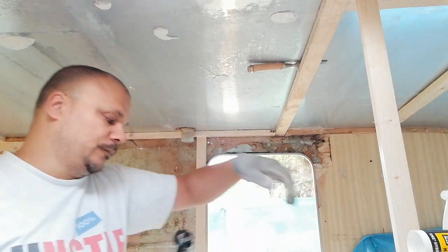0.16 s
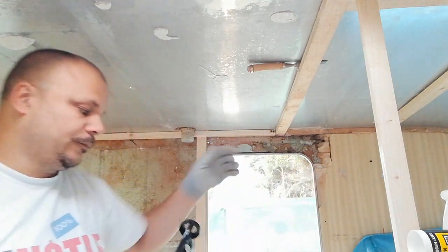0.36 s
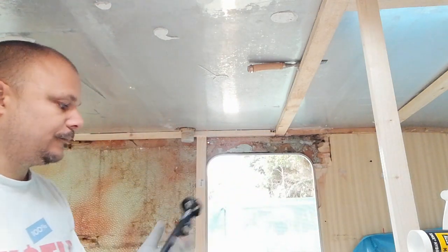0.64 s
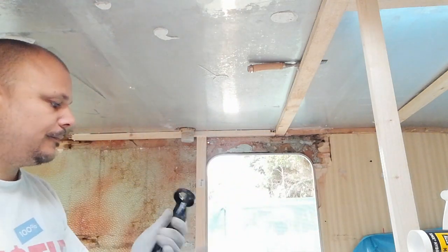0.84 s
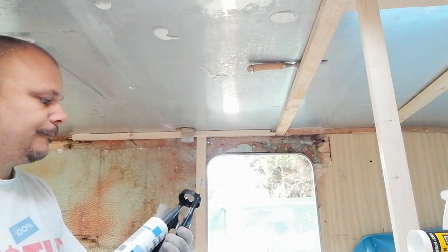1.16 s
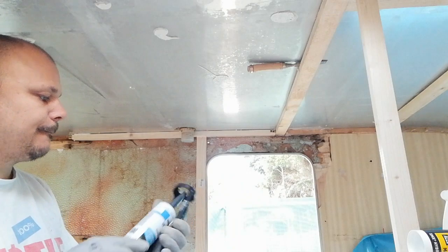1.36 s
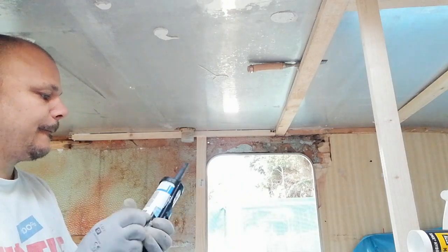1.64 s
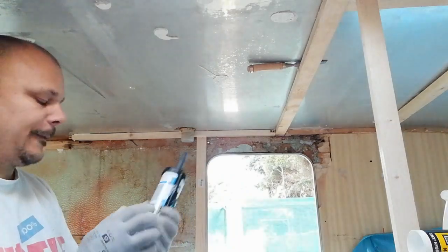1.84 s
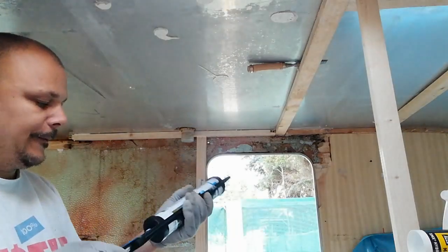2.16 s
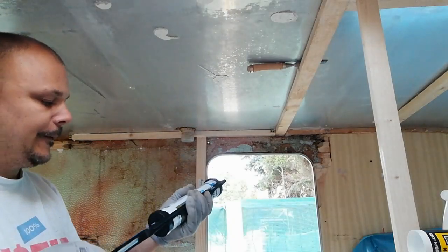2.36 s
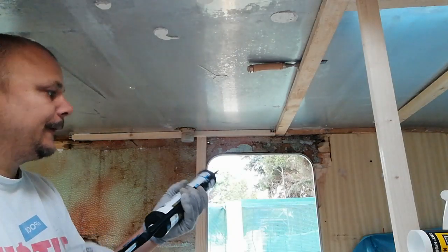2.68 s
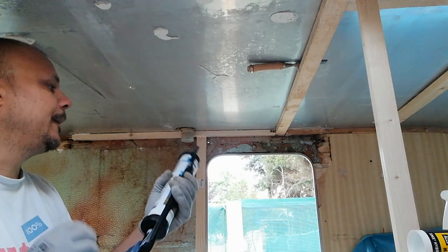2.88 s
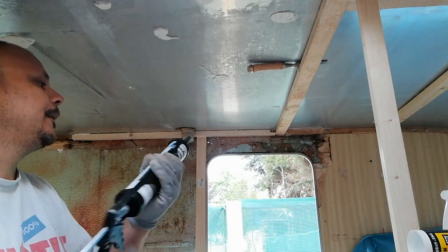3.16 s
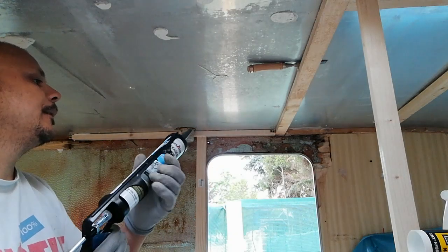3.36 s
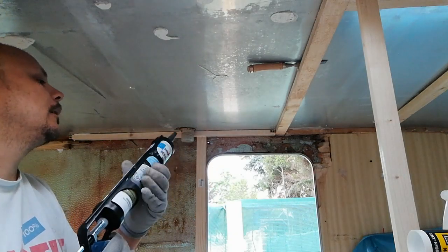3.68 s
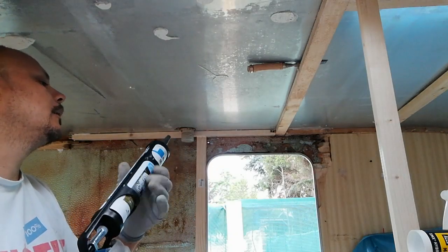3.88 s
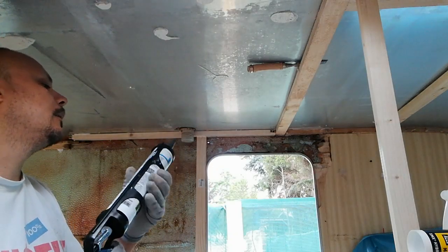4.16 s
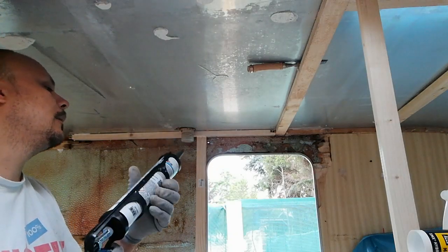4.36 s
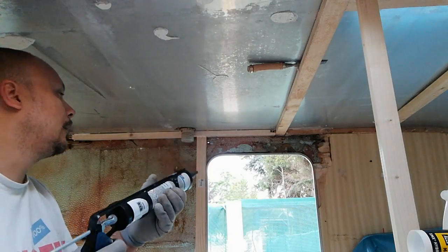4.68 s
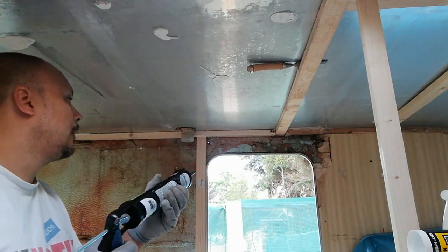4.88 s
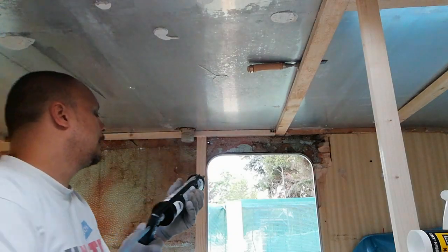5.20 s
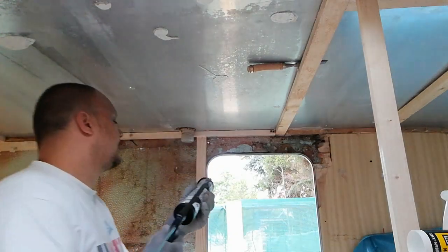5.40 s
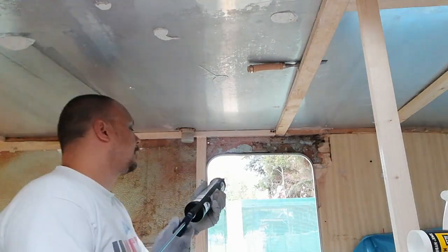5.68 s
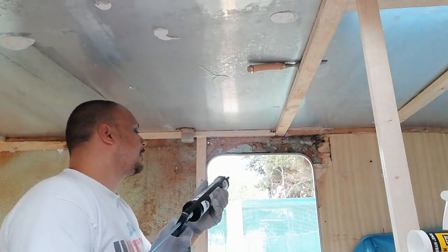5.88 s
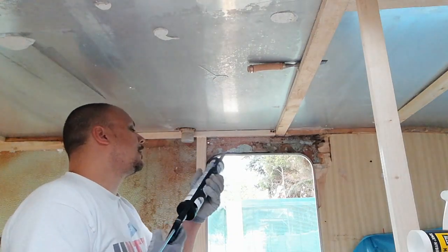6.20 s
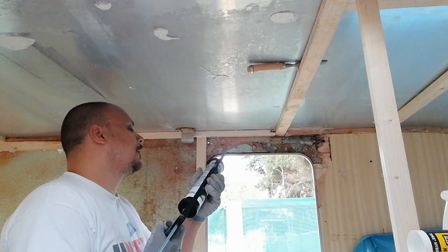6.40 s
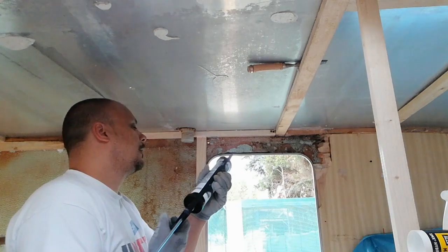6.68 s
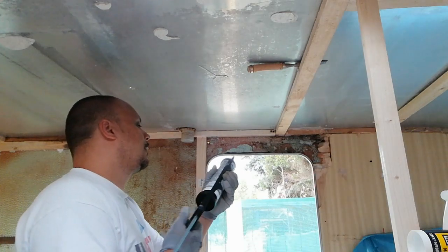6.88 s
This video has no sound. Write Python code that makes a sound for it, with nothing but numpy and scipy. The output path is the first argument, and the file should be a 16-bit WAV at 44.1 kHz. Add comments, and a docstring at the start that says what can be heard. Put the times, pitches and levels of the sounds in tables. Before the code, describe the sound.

Close stereo sound in a small, bare-panelled caravan with short echo; a very quiet low rumble and distant murmur come from outside. A soft rub and faint knock open, another light tap at 0.2 s, then small bright metal clicks around 0.75-0.85 and soft floor thuds. A faint airy squeak hangs near 1 s. From 1.45 clicks gather quickly into hard, hollow and metallic clacks at 1.54-1.6, followed by a scrape and an uneven fading rattle to about 1.8. A firm low hollow knock lands at 2.55. A crisp double click at 3.3 leaves a thin spring tone. Then mostly faint glove rustle and slides, tiny taps near 4.1 and 4.7-5. Light sliding from 5.2 leads to the loudest, sharp metallic snap at 5.57. A bright raspy slide and click come at 6.15, then soft rubbing and a dull foot thud at 6.9.

```python
"""A soft rub and a light knock come first, as a sealant cartridge is pushed into a steel caulking gun in a bare caravan.
Bursts of chatter knock the hollow tube, frame and rod; runs of tiny slips slide over the same three parts.
Clusters of beating modes ring the gun, a paired tone sings as its spring, and narrow noise squeaks in the rod guide.
Coloured noise makes the glove rustle, the thuds of shifting feet and the quiet outdoor rumble and murmur."""
import sys
import numpy as np
from scipy import signal
from scipy.fft import rfft, irfft, next_fast_len
from scipy.io import wavfile
from scipy.ndimage import map_coordinates

SR = 44100
rng = np.random.default_rng(int(sys.argv[2]) if len(sys.argv) > 2 else 0)


def put_to_file(sound):
    """Save the sound as 16-bit audio at rate SR, in the file named by the first command-line argument."""
    columns = np.atleast_2d(sound).T  # one column per channel
    safe = np.clip(columns, -1, 1)
    whole_steps = np.round(safe * 32767)
    wavfile.write(sys.argv[1], SR, whole_steps.astype(np.int16))


N = 310419  # samples

# Contacts of the gun's parts: (t/s, relative level/dB of hollow tube, of frame, of rod, struck spot's favoured f/Hz)
CONTACT_HITS = [(0.039, -57, -59, -70, 1240), (.203, -51.5, -57, -54.5, 1490),
                (.744, -63, -50.5, -51.5, 2980), (.797, -53, -44.5, -52.5, 4900),
                (.835, -65, -53, -65, 4900), (1.34, -72, -63.5, -75, 1270), (1.452, -69, -72, -57.5, 11000),
                (1.475, -53, -56, -48, 11100), (1.492, -54, -50, -43.5, 1620),
                (1.538, -36.5, -43, -41, 1400), (1.579, -29.5, -33, -23.5, 1120),
                (1.5873, -28.5, -22.5, -20.5, 8900), (1.604, -47, -28, -36, 2720),
                (1.696, -43, -57, -50.5, 1290), (1.775, -50, -49.5, -74.5, 1080),
                (1.817, -52, -47, -60, 1440), (2.316, -60.5, -70, -68, 1324), (2.52, -61, -42.5, -54, 3600),
                (2.53, -42.5, -54, -48, 1420), (2.553, -43, -43, -48, 1700),
                (2.5574, -24.5, -37.5, -31, 780), (3.2861, -36.5, -41.5, -42, 1410),
                (3.3187, -41.5, -42.5, -40, 1400), (4.06, -55, -59, -60.5, 750),
                (4.127, -58, -66, -67.5, 760), (4.716, -76, -54.5, -47, 7200),
                (4.844, -50.5, -54, -47.5, 6660), (5.034, -65, -56, -51.5, 1310),
                (5.255, -60, -60, -55.5, 4060), (5.315, -49, -60, -67, 2170),
                (5.526, -54, -47.5, -60, 2340), (5.5625, -43, -26, -27.5, 7200),
                (5.574, -26.5, -16, -17.5, 2150), (5.691, -50, -55, -48.5, 1600),
                (6.147, -46, -41, -34.5, 3740)]
# First bounce of the loose cartridge, on the contacts' scale: (tube level/dB, frame level/dB, rod level/dB)
FIRST_BOUNCE_DB = (-38.5, -37, -33.5)
# Sliding strokes of tube, rod and glove: (start t/s, rise t/s, fade t/s, relative level/dB,
# brightness level/dB: lifts the rod hiss and lowers the hollow tube)
SLIDE_STROKES = [(0, 0.0037, 0.023, -58, 0.5), (.2, 0.012, 0.061, -56, -4.5), (.733, 0.053, 0.1, -57, -2.5),
                 (1.491, 0.0057, .13, -44, 5.5), (1.628, .02, 0.12, -47, -3),
                 (1.76, 0.064, 0.082, -58.5, 0), (1.866, .035, 0.024, -53, 1),
                 (2.098, 0.024, .04, -70.5, 2), (2.49, 0.059, .02, -54.5, -5.5),
                 (3.282, .007, .007, -40.5, -2), (3.33, 0.026, .16, -60, -2.5),
                 (3.72, 0.073, 0.06, -66.5, -0.5), (4.24, .09, 0.034, -67, -0.5),
                 (4.701, 0.014, 0.093, -53, 1), (5.024, 0.015, 0.063, -52.5, 1.5),
                 (5.2, 0.46, .22, -58.5, 2), (5.8, 0.068, 0.081, -53, -3.5), (5.859, .05, 0.016, -57, 7),
                 (6.08, 0.068, .01, -58.5, 2), (6.134, 0.024, 0.089, -39, 4.5),
                 (6.33, 0.024, 0.029, -65, 4), (6.553, 0.02, 0.17, -60, -2.5),
                 (6.888, 0.0094, .1, -59, 1.5)]
# Colour of the hollow tube when struck or rubbed: (f/Hz, relative level/dB)
TUBE_COLOUR = [(60, -28), (200, -26), (320, -17.5), (450, -14), (580, -14), (700, -10.5), (850, -4.5),
               (1000, -8), (1300, 3.5), (1480, -0.5), (1800, -5), (2300, -10), (3500, -41), (9000, -67.5)]
# Colour of the frame: (f/Hz, relative level/dB)
FRAME_COLOUR = [(200, -20), (1000, -27.5), (1850, -5), (2550, 4), (3200, -2), (3900, 0), (4700, -0.5),
                (6000, -3.5), (8000, -14.5), (15000, -42.5)]
# Colour of the push rod: (f/Hz, relative level/dB)
ROD_COLOUR = [(1500, -60.5), (5000, -9), (6900, -4.5), (8000, -1), (9000, -3.5), (9700, -9), (10500, -15),
              (13000, -18), (15800, -22.5)]
# Clusters of close modes of the loaded gun: (f/Hz, half-width f/Hz, relative level/dB, t60 t/s)
RING_MODES = [(835.7, 6.2, 1, 0.19), (1160, 55, -6, 0.23), (1426, 49, 2.5, 0.12), (1770, 190, -6.5, .18),
              (1790, 70, -4, 0.31), (2540, 140, -4, 0.22), (3780, 200, -3, 0.3), (4840, 670, -1, 0.3),
              (6910, 400, -2.5, 0.17), (9500, 300, -1, .08)]
# Trigger spring singing on: (t/s, level/dB)
SPRING_TWANGS = [(2.772, -68.5), (3.325, -51.5), (4.7, -62)]
# Rod squeaking in its guide: (t/s, f/Hz, half-width f/Hz, level/dB, t60 t/s)
ROD_SQUEAKS = [(.985, 2033, 192, -58, 0.75), (5.315, 2133, 272, -61, 1.2)]
# Rustle of gloves and sleeves over time: (t/s, level/dB)
GLOVE_LEVELS = [(0, -64), (.65, -67.5), (.95, -62.5), (1.4, -67), (2.05, -71), (3.1, -72), (3.8, -66),
                (4, -70.5), (4.28, -66.5), (4.47, -76.5), (4.7, -64), (4.97, -72), (5.15, -69), (5.27, -64),
                (5.7, -64), (6.02, -72), (6.45, -68.5), (7.04, -73)]
# Colour of rubbed cloth: (f/Hz, relative level/dB)
CLOTH_COLOUR = [(900, -28), (2000, -1), (3500, -3.5), (6000, -6), (8600, 0), (10500, -11), (15000, -17.5)]
# Feet shifting on the floor: (t/s, rise t/s, level/dB)
FOOT_THUDS = [(0, 0.01, -59), (.76, 0.11, -58.5), (.92, .08, -53), (1.88, 0.027, -59), (5, 0.037, -58.5),
              (5.563, 0.0046, -54), (5.82, 0.062, -55), (6.158, 0.065, -51.5), (6.884, 0.033, -43.5)]
# Colour of the light floor: (f/Hz, relative level/dB)
FLOOR_COLOUR = [(20, -18.5), (60, -12), (95, 5), (135, 3.5), (190, -6.5), (300, -20.5), (500, -22.5),
                (1000, -24.5), (3000, -74)]
# Echo decay of the bare panels: (f/Hz, t60 t/s)
CARAVAN_DECAY = [(100, 0.097), (500, 0.31), (1400, 0.18), (3000, 0.23), (8000, 0.18), (15000, 0.16)]
# Sound from outside over time: (t/s, rumble level/dB, relative murmur level/dB)
OUTSIDE_LEVELS = [(0, -60, -64.5), (2.4, -67.5, -71), (4.5, -66.5, -72.5), (5.4, -62.5, -69.5),
                  (6.7, -65.5, -71), (7.04, -56.5, -71)]
# Colour of the low rumble: (f/Hz, relative level/dB)
RUMBLE_COLOUR = [(10, -4), (28, -8.5), (52, 5), (75, -6), (100, -2), (128, -3), (165, -9), (260, -14),
                 (500, -39), (1500, -52)]
# Colour of the far murmur: (f/Hz, relative level/dB)
MURMUR_COLOUR = [(100, -15.5), (300, 3.5), (600, 1), (850, 5), (1300, 5.5), (1900, -0.5), (3000, -20.5),
                 (8000, -29)]
# Colour difference of the two microphone ports: (f/Hz, left minus right level/dB)
PORT_BALANCE = [(200, -0.5), (700, 1.5), (1300, -1.0), (2800, 2.5), (5500, 2), (9000, -4.0), (14000, -0.5)]

PARTS = (TUBE_COLOUR, FRAME_COLOUR, ROD_COLOUR)
PORT_DELAY_S = 0.28 / 343  # microphone port spacing (m) over the speed of sound (m/s)
TOP_HZ = 15900  # band limit


def contacts(chatter_t60_s=0.022, seating_s=0.00041, softening=0.55, level_db=25):
    """Each contact chatters for a few milliseconds and excites tube, frame and rod."""
    out = np.zeros((2, N))
    t = np.arange(SR // 3) / SR
    blows = np.vstack([np.array(CONTACT_HITS)[:, :-1], rattle()])
    hardest_db = np.max(blows[:, 1:])
    for s, *levels in blows:
        # gentler touches seat more slowly: softening is dB of seating time per dB of level
        seating = seating_s * amp(softening * (hardest_db - max(levels)))
        envelope = amp(-60 * t / chatter_t60_s) * (1 - np.exp(-t / seating))
        common, *separate = rng.standard_normal((3, len(t))) * envelope
        # half of the direct power is common to both ports; the echo rings from that half
        direct = common + np.array(separate)
        echo = signal.fftconvolve(common[None], caravan(), axes=1)[:, :len(t)]
        blow = unit(direct) + unit(echo)
        for part, db in zip(PARTS, levels):
            add(out, s, amp(db + level_db) * unit(body(blow, part)) / np.sqrt(len(t)))
    return out


def rattle(start_s=1.608, length_s=0.15, loss_db=21, count=7):
    """The cartridge settles in its cradle in uneven bounces that tend to soften."""
    progress = (np.arange(count) + rng.random(count)) / count
    levels = np.array(FIRST_BOUNCE_DB) - loss_db * progress[:, None]
    levels = levels + 2 * rng.standard_normal((count, 3))
    return np.column_stack([start_s + length_s * progress, levels])


def rings(light_ring_db=-50, touch_db=-47.5, ring_growth=0.62, reach_octaves=0.28, reach_growth=0.16):
    """Each tabled contact leaves the gun ringing, strongest in modes near the struck spot's own pitch."""
    out = np.zeros((2, N))
    modes = []
    for hz, width, db, t60 in RING_MODES:
        modes.append(amp(db) * cluster(hz, width, 0.0015, t60, size=SR // 3))
    modes = np.array(modes)
    modes_hz = np.array(RING_MODES)[:, 0]
    for s, *levels, spot_hz in CONTACT_HITS:
        force_db = max(levels) - touch_db  # reckoned against a light touch
        # harder blows wake a wider range; both growths are dB per dB of force
        reach = reach_octaves * amp(reach_growth * force_db)
        nearness = np.exp(-(np.log2(modes_hz / spot_hz) / reach) ** 2)
        ring = np.tensordot(nearness, modes, 1)
        add(out, s, amp(light_ring_db + ring_growth * force_db) * ring)
    return out


def strokes(rough_db=3.0, slip_rate_hz=400, frame_rub_db=-3.5, room_db=-1, level_db=-1):
    """Sliding is a dense, rough run of tiny slips that excites tube, frame and rod."""
    out = np.zeros((2, N))
    shapes = np.array([swell(*row[:3]) for row in SLIDE_STROKES])
    slips = unit(amp(rough_db * wobble(slip_rate_hz)))
    db, bright_db = np.transpose(SLIDE_STROKES)[3:]
    part_levels = (db - bright_db, db + frame_rub_db, db + bright_db)
    for part, levels in zip(PARTS, part_levels):
        force = np.sqrt(amp(levels) ** 2 @ shapes ** 2)  # overlapping strokes add in power
        out += body(force * slips * diffuse(N), part)
    echo = signal.fftconvolve(out, caravan(), axes=1)[:, :N]
    return amp(level_db) * (out + amp(room_db) * echo)


def spring(hz=1203, rise_s=0.032, t60_s=0.76, beat_hz=5, partner_db=-9):
    """The trigger spring rings on as a thin tone that beats gently with a weaker twin."""
    out = np.zeros((2, N))
    t = np.arange(SR) / SR
    fade = amp(-60 * t / t60_s) * (1 - np.exp(-t / rise_s))
    for s, db in SPRING_TWANGS:
        phase = 2 * np.pi * rng.random() + rng.normal(0, 0.5, (2, 1))  # differs between the ports
        tone = np.sin(2 * np.pi * hz * t + phase)
        twin = np.sin(2 * np.pi * (hz + beat_hz) * t + phase)
        add(out, s, amp(db) * np.sqrt(2) * (tone + amp(partner_db) * twin) * fade)
    return out


def squeaks():
    """The sliding rod gives thin, airy squeaks: narrow clusters of modes that swell and fade."""
    out = np.zeros((2, N))
    for s, hz, width, db, t60 in ROD_SQUEAKS:
        add(out, s, amp(db) * cluster(hz, width, 0.0095, t60))
    return out


def gloves(tick_db=19, ticks_per_s=5, flutter_db=1):
    """Cloth rubs softly all the time as fluttering noise, with sparse ticks from the grip in the rod's colour."""
    rustle_db, = curves(GLOVE_LEVELS)
    rub = amp(flutter_db * wobble(11)) * rush(CLOTH_COLOUR)
    tick_sizes = amp(tick_db + 2 * rng.standard_normal((2, N)))
    ticks = (rng.random(N) < ticks_per_s / SR) * tick_sizes
    return amp(rustle_db) * (rub + body(ticks, ROD_COLOUR))


def floor_thuds(fade_s=0.12):
    """The light floor booms as weight shifts on it: low noise in short swells."""
    push = sum(amp(db) * swell(s, rise, fade_s) for s, rise, db in FOOT_THUDS)
    return push * rush(FLOOR_COLOUR)


def caravan(build_s=0.0023):
    """The dense, short echo of the bare panels: fading diffuse noise of energy 1 in all, averaged over channels."""
    size = SR // 3
    hz, t, z = signal.stft(diffuse(size), SR, nperseg=128)
    decay = amp(-60 * t / along(CARAVAN_DECAY, hz)[:, None])
    tail = signal.istft(z * decay, SR)[1][:, :size]
    tail = tail * (1 - np.exp(-np.arange(size) / SR / build_s))
    return unit(tail) / np.sqrt(size)


def outdoors(murmur_gain_db=-1, side_db=-3, drift_db=0.36):
    """A low rumble and a far murmur pass the thin walls; part of the murmur reaches the left port first."""
    rumble_db, murmur_db = curves(OUTSIDE_LEVELS)
    delays = [0, PORT_DELAY_S]
    leftward = filtered(rush(MURMUR_COLOUR)[0], lambda hz: np.exp(-2j * np.pi * np.outer(delays, hz)))
    murmur = rush(MURMUR_COLOUR) + amp(side_db) * leftward
    murmur_level = amp(murmur_db + murmur_gain_db + drift_db * wobble(1.5))
    return amp(rumble_db) * rush(RUMBLE_COLOUR) + murmur_level * murmur


def cluster(hz, width, rise, t60, size=SR):
    """Close modes around hz, made from narrow noise, beat against each other as they fade."""
    t = np.arange(size) / SR
    noise = rng.standard_normal(size) + rng.standard_normal((2, size))  # common plus separate
    modes = filtered(noise, lambda f: 1 / (1 + ((f - hz) / width) ** 4))
    fade = amp(-60 * t / t60) * (1 - np.exp(-t / rise))
    return unit(modes * fade) * np.sqrt(np.mean(fade ** 2))


def body(x, spectrum, size=2048):
    """Ring a part with the stereo force x through a causal minimum-phase response of energy 1."""
    cepstrum = irfft(np.log(amp(along(spectrum, np.fft.rfftfreq(size, 1 / SR)))))
    # folding the cepstrum forward in time makes the response causal
    cepstrum[1:size // 2] *= 2
    cepstrum[size // 2 + 1:] = 0
    response = irfft(np.exp(rfft(cepstrum)))
    response = response / np.linalg.norm(response)
    return signal.fftconvolve(x, response[None], axes=1)[:, :x.shape[1]]


def rush(spectrum):
    """Coloured diffuse noise of rms 1."""
    return unit(filtered(diffuse(N), lambda hz: amp(along(spectrum, hz))))


def diffuse(n):
    """Stereo noise from all sides: the ports agree only on waves longer than their spacing."""
    def turn(hz):
        return np.arccos(np.sinc(2 * hz * PORT_DELAY_S)) / 2

    noise = rng.standard_normal((2, n))
    mid, side = filtered(noise, lambda hz: np.array([np.cos(turn(hz)), np.sin(turn(hz))]))
    return np.array([mid + side, mid - side])


def swell(start, rise, fade):
    """An envelope that climbs to 1 and sinks back in straight lines."""
    corners = start + np.cumsum([0, rise, fade])
    return np.interp(np.arange(N) / SR, corners, [0, 1, 0])


def wobble(rate):
    """A smooth random curve, rate knots a second."""
    knots = rng.standard_normal(int(N * rate / SR) + 4)
    return map_coordinates(knots, [np.arange(N) * rate / SR], order=2)


def curves(rows):
    """One value per sample for each column after the time."""
    s, *cols = np.transpose(rows)
    return [np.interp(np.arange(N) / SR, s, c) for c in cols]


def along(points, hz):
    """Read (f/Hz, value) points on a log frequency axis."""
    f, v = np.transpose(points)
    return np.interp(np.log(hz + 1), np.log(f + 1), v)


def filtered(x, response):
    """Filter x by a complex response of frequency."""
    n = x.shape[-1]
    m = next_fast_len(n + SR // 10)
    return irfft(rfft(x, m) * response(np.fft.rfftfreq(m, 1 / SR)), m)[..., :n]


def add(track, s, sound):
    """Mix a sound into a track at time s."""
    start = max(0, round(s * SR))
    part = track[..., start:start + sound.shape[-1]]
    part += sound[..., :part.shape[-1]]


def amp(db):
    """Decibels to an amplitude factor."""
    return 10 ** (np.asarray(db) / 20)


def unit(x):
    """Scale to rms 1."""
    return x / np.sqrt(np.mean(x ** 2) + 1e-20)


def scene():
    """The gun in the hands, over the quiet of the caravan."""
    gun = contacts() + rings() + strokes() + spring() + squeaks()
    return gun + gloves() + floor_thuds() + outdoors()


def record(dry):
    """The two microphone ports differ a little in colour; nothing passes above the band limit."""
    def ports(hz):
        tilt_db = np.outer([0.5, -0.5], along(PORT_BALANCE, hz))
        return amp(tilt_db) * (hz < TOP_HZ)

    return filtered(dry, ports)


dry = scene()
out = record(dry)
put_to_file(out)
```